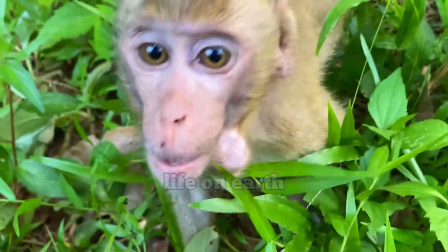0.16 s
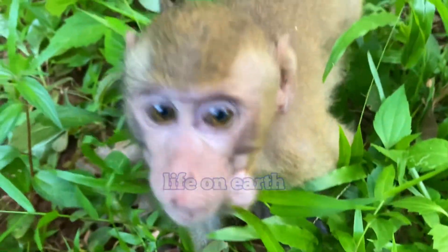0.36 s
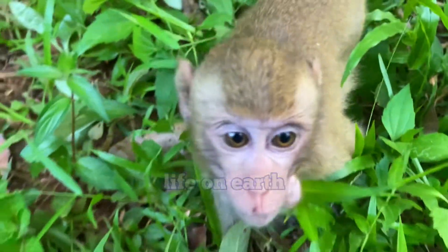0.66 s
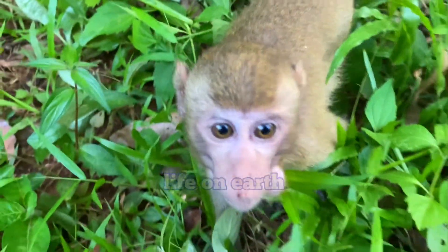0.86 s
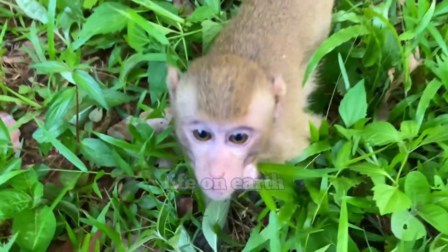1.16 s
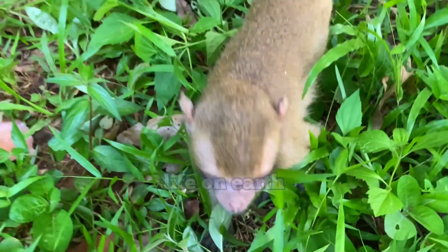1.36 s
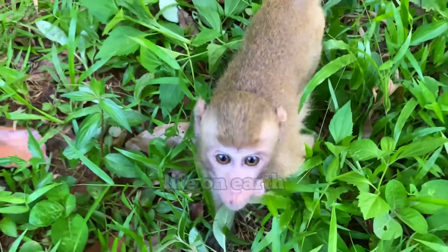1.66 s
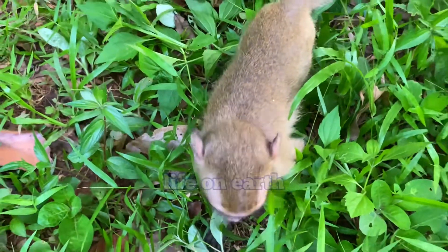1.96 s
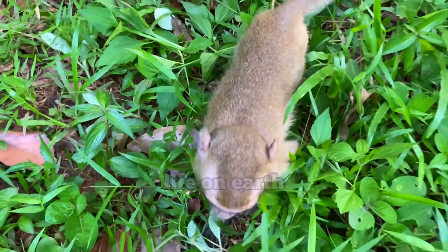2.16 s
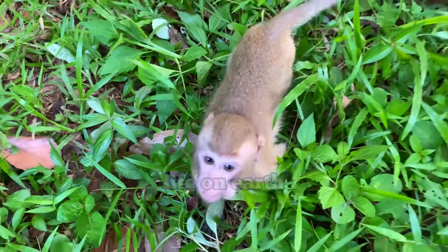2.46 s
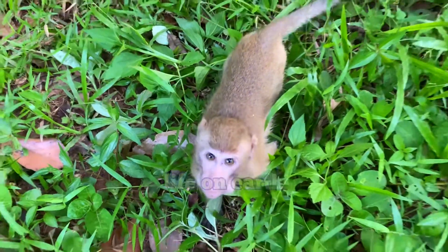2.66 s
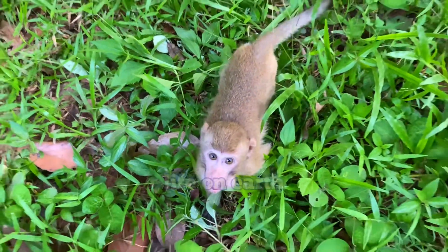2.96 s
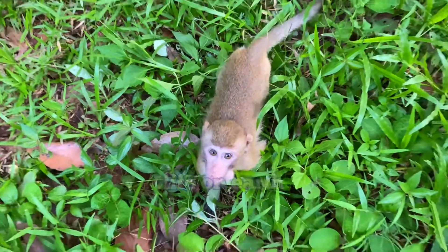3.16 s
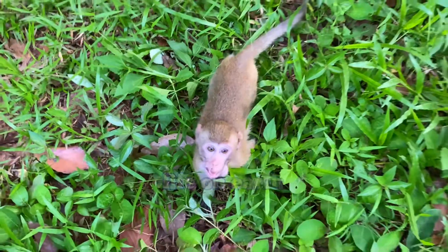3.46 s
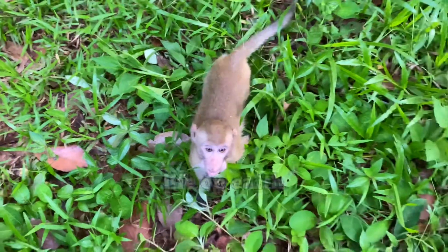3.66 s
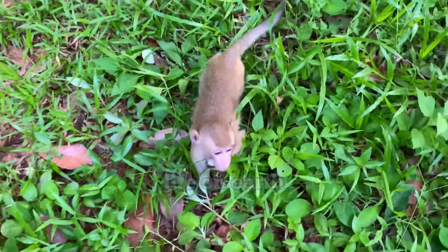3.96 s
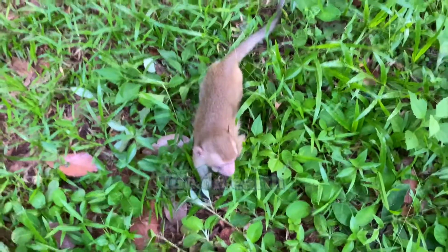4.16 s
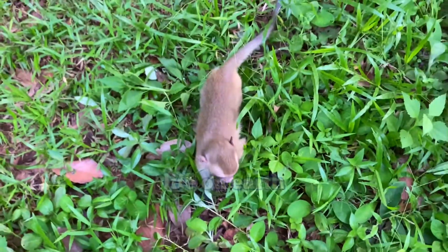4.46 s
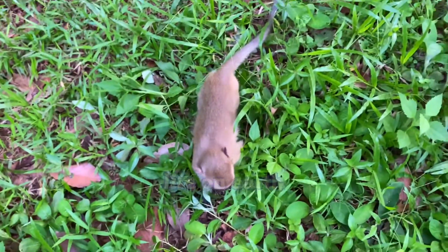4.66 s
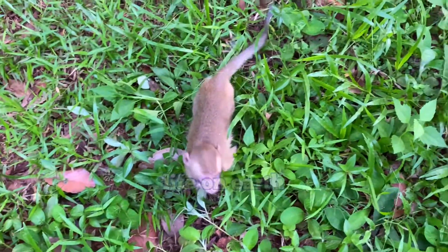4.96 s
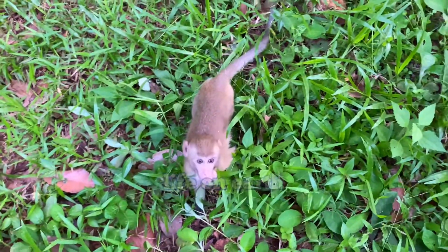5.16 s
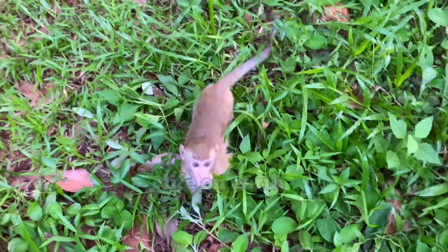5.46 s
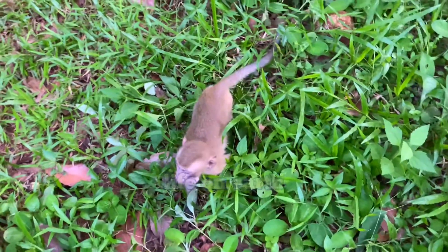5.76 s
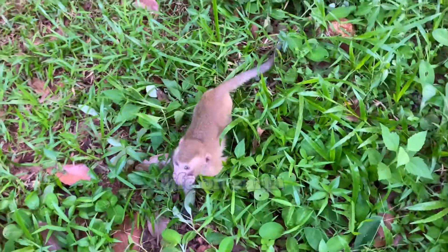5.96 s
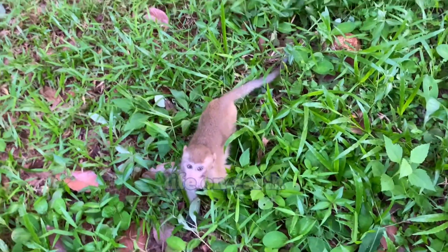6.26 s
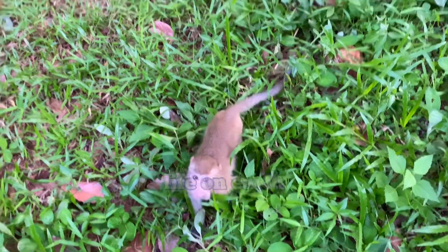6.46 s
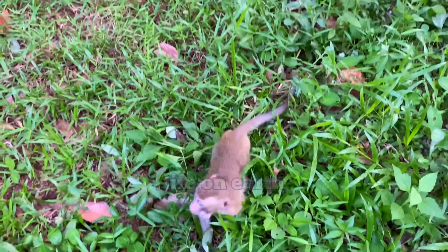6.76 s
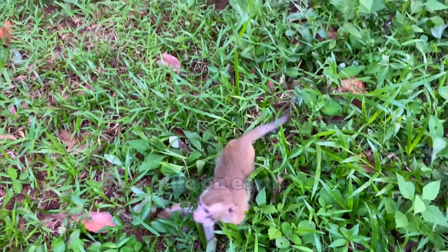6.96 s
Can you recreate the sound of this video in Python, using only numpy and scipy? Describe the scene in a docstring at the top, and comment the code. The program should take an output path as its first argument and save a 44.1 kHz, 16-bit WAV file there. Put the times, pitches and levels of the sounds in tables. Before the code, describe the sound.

Irregular crisp snaps and leafy rustles thicken into a busy crunching flurry outdoors, then a soft grass swish fades toward a few short bird whistles.

```python
"""Small monkey foraging in grass and dry leaves

Stems snap as noise slips ringing a thud, crack and tick; leaves rustle as dense tiny bursts mixed with noise.
Fur brushes stiff blades as resonant ticks; wind, far air, insects and a long grass swish are shaped noise.
A far cricket trills in tone pulses, a hand bumps the phone in low swings, a bird whistles falling tones at the end.
Two microphone ports hear all this partly alike, with phase and level offsets by band.
"""
import sys
import numpy as np
from scipy import signal
from scipy.fft import rfft, irfft, next_fast_len
from scipy.io import wavfile
from scipy.ndimage import uniform_filter1d

SR = 44100
rng = np.random.default_rng(int(sys.argv[2]) if len(sys.argv) > 2 else 0)


def master_out(mix):
    """Clip the mix to full scale and print it as 16-bit PCM to the path in sys.argv[1]."""
    frames = np.transpose(np.atleast_2d(mix))
    ceiling = np.clip(frames, -1, 1)
    pcm = np.round(ceiling * 32767).astype(np.int16)
    wavfile.write(sys.argv[1], SR, pcm)


N = 313551


def gain_of(db):
    """Amplitude factor of a level in dB."""
    return 10 ** (np.asarray(db) / 20)


def evened(x):
    """Scales to unit RMS."""
    return x / np.sqrt(np.mean(x ** 2) + 1e-20)


def peaked(x):
    """Scales each channel to unit peak."""
    return x / abs(x).max(axis=-1, keepdims=True)


def read(points, hz, column=1):
    """Interpolates a table column over log frequency."""
    points = np.asarray(points)
    return np.interp(np.log(hz + 1), np.log(points[:, 0] + 1), points[:, column])


def curve(points, column=1):
    """Interpolates a table column over every sample of the scene."""
    points = np.asarray(points)
    return np.interp(np.arange(N) / SR, points[:, 0], points[:, column])


def add(mix, start_s, sound):
    """Adds a sound in place, cut at the scene's end."""
    part = mix[..., round(start_s * SR):][..., :sound.shape[-1]]
    part += sound[..., :part.shape[-1]]


def stereo_noise():
    """Independent white noise in two channels."""
    return rng.standard_normal((2, N))


def coloured(x, spectrum):
    """Filters by a level-over-frequency table, then scales to unit RMS."""
    size = next_fast_len(N)
    gains = gain_of(read(spectrum, np.fft.rfftfreq(size, 1 / SR)))
    return evened(irfft(rfft(x, size) * gains, size)[..., :N])


def ring(x, hz, width_hz):
    """Damped resonance; two equal sections steepen its skirts."""
    r = np.exp(-np.pi * width_hz / SR)
    section = [1, 0, -1, 1, -2 * r * np.cos(2 * np.pi * hz / SR), r * r]
    return signal.sosfilt([section, section], x)


def flicker(seconds):
    """Random wavering of unit RMS: noise averaged twice over the span."""
    span = max(round(seconds * SR), 2)
    smooth = uniform_filter1d(rng.standard_normal(N), span)
    return evened(uniform_filter1d(smooth, span))


def crackle(per_s, spread_db, decay_ms):
    """Tiny decaying noise bursts of uneven size at random moments."""
    size_db = spread_db * np.minimum(rng.exponential(1, N), 4)
    hits = gain_of(size_db) * (rng.random(N) < per_s / SR)
    t = np.arange(600) / SR
    swell = signal.oaconvolve(hits, np.exp(-t / (decay_ms / 1000)))[:N]
    return evened(swell) * stereo_noise()


# Leaf rustle over time. Each row: time in seconds, body level in dB, hiss level in dB, both before wavering.
RUSTLE_LEVELS = [(0.0, -42.5, -43.5), (0.25, -50.5, -49), (0.52, -42, -45.5), (0.63, -44, -46),
                 (0.7, -42.5, -44), (0.79, -43.5, -42), (0.92, -40.5, -43), (1.0, -47, -49.5),
                 (1.6, -47, -52), (1.78, -50.5, -51), (1.9, -46, -53.5), (2.0, -50, -54),
                 (2.18, -46.5, -47.5), (2.55, -49, -52.5), (3.08, -40.5, -46.5), (3.25, -48, -54),
                 (3.5, -48.5, -54), (3.82, -44, -49), (4.05, -50.5, -54.5), (4.5, -47.5, -51.5),
                 (4.65, -43.5, -47), (4.9, -42.5, -42), (5.01, -47, -42.5), (5.09, -35.5, -42),
                 (5.125, -42.5, -44), (5.17, -35.5, -41.5), (5.26, -43, -43), (5.33, -39.5, -45.5),
                 (5.37, -45.5, -46.5), (5.46, -45.5, -50), (5.55, -44, -45.5), (5.63, -48.5, -53.5),
                 (5.75, -42, -44), (5.88, -38.5, -46.5), (6.06, -47, -46.5), (6.2, -40, -46),
                 (6.32, -45, -53), (6.42, -46.5, -51.5), (7.11, -50, -56.5)]
# Spectrum of the leaf body. Each row: frequency in Hz, relative level in dB.
LEAF_BODY_SPECTRUM = [(60, -55), (120, -6), (280, 3), (700, 0), (1400, -5.5), (2000, -14.5), (3000, -16),
                      (6000, -87)]
# Spectrum of the leaf hiss. Each row: frequency in Hz, relative level in dB.
LEAF_HISS_SPECTRUM = [(1500, -6), (2300, 7.5), (3200, -7), (4400, 4.5), (6500, -7), (8000, -8),
                      (12300, -6.5), (13200, -12), (14800, -46), (15800, -55)]
DRYNESS = .35  # 1 = crackling leaf only, 0 = smooth noise only


def rustle():
    """Many small leaf snaps blur into a body and a hiss; smooth noise fills in for soft grass."""
    shared = crackle(250, 0.8, 2.55)
    body_leaf = shared + 1.2 * crackle(250, 3.5, 1.4)
    hiss_leaf = shared + 2.0 * crackle(300, 5.2, 8.0)
    body = DRYNESS * body_leaf + 1.07 * (1 - DRYNESS) * stereo_noise()
    hiss = DRYNESS * hiss_leaf + 1.05 * (1 - DRYNESS) * stereo_noise()
    body_db = curve(RUSTLE_LEVELS) + 2.2 * flicker(.012)
    hiss_db = curve(RUSTLE_LEVELS, column=2) + 1.1 * flicker(.012)
    return (gain_of(body_db) * coloured(body, LEAF_BODY_SPECTRUM)
            + gain_of(hiss_db) * coloured(hiss, LEAF_HISS_SPECTRUM))


# Fur brushing blades over time. Each row: time in seconds, level in dB.
BRUSH_LEVELS = [(0, -60), (.15, -68), (.5, -49), (.64, -55), (.69, -44), (.79, -52), (.85, -41), (.96, -47),
                (1.0, -54), (1.3, -69.5), (1.58, -46), (1.7, -53), (2.0, -68), (2.2, -69), (2.5, -58),
                (2.8, -80)]
BRUSH_HZ, BRUSH_WIDTH_HZ = 4770, 1500


def brush():
    """Fur brushes stiff blades near the phone: dense ticks and soft hiss in one broad high resonance."""
    ticks = crackle(660, 5.7, 5.1) + 0.38 * stereo_noise()
    return gain_of(curve(BRUSH_LEVELS)) * evened(ring(ticks, BRUSH_HZ, BRUSH_WIDTH_HZ))


# Wind at the ports over time. Each row: time in seconds, level in dB before a 3 dB lift and wavering.
WIND_LEVELS = [(0.0, -40), (0.57, -43), (0.73, -46.5), (0.87, -42), (1.35, -49.5), (1.45, -42.5),
               (2.0, -49), (2.1, -45), (2.3, -43.5), (2.7, -46), (2.75, -29.5), (2.81, -47), (2.95, -43),
               (3.08, -43), (3.2, -41), (3.34, -49), (3.54, -40.5), (3.7, -43.5), (3.95, -42), (4.14, -44),
               (4.45, -43.5), (4.77, -44), (5.13, -44), (5.5, -44), (5.7, -44), (6.4, -44), (7.0, -46),
               (7.11, -40.5)]
# Spectrum of the wind. Each row: frequency in Hz, relative level in dB.
WIND_SPECTRUM = [(15, -41), (30, -13.5), (48, 0), (64, 3.5), (80, 2.5), (110, -5.5), (170, -9), (300, -27),
                 (700, -100)]


def wind():
    """Lumpy low rumble of air at the ports, with one short surge at the hand's bump."""
    waver_db = 0.5 * flicker(0.02) + 0.67 * flicker(0.062)
    level_db = curve(WIND_LEVELS) + 3.0 + waver_db
    return gain_of(level_db) * coloured(stereo_noise(), WIND_SPECTRUM)


# Spectrum of the far air. Each row: frequency in Hz, relative level in dB.
AIR_SPECTRUM = [(60, -34), (150, 16), (280, 11), (700, -1), (1400, -10), (2300, -4), (4400, -24),
                (6500, -48), (9000, -25), (12500, -42), (13200, -76)]
AIR_DB = -55


def air():
    """Steady far outdoor air: shaped noise, mostly low."""
    return gain_of(AIR_DB) * coloured(stereo_noise(), AIR_SPECTRUM)


# Spectrum of the insect chorus. Each row: frequency in Hz, relative level in dB.
INSECT_SPECTRUM = [(6000, -70), (7000, -36), (8000, -4), (9200, -5.5), (10300, 1.5), (11500, -1),
                   (12300, 0), (13100, -61)]
INSECTS_DB = -53.5  # before wavering


def insects():
    """A far insect chorus blurs into a steady high band of noise, wavering slightly."""
    return gain_of(INSECTS_DB + 0.47 * flicker(0.041)) * coloured(stereo_noise(), INSECT_SPECTRUM)


SMALL_SNAPS = 25
SMALL_THUD_OVER_BODY_DB, SMALL_CRACK_OVER_HISS_DB = 10, 12  # upper limits before the lifts in snaps()
SMALL_TICK_DB, SMALL_SPREAD_DB = -63, 5
SMALL_THUD_HZ, SMALL_CRACK_HZ, SMALL_MS = (402, 1720), (2340, 5750), (0.92, 1.3)  # ranges


def between(ends, share):
    """Geometric interpolation between two ends."""
    return ends[0] * (ends[1] / ends[0]) ** share


def small_snaps():
    """Rows for faint snaps at random moments, more often and louder where the rustle is strong."""
    when, thud, crack, length = rng.random((SMALL_SNAPS, 4)).T
    thud_drop_db, crack_drop_db = SMALL_SPREAD_DB * abs(rng.standard_normal((2, SMALL_SNAPS)))
    body_db, hiss_db = curve(RUSTLE_LEVELS), curve(RUSTLE_LEVELS, column=2)
    busy = np.cumsum(gain_of(body_db))
    at = np.searchsorted(busy, when * busy[-1])
    thud_db = body_db[at] + SMALL_THUD_OVER_BODY_DB - thud_drop_db
    crack_db = hiss_db[at] + SMALL_CRACK_OVER_HISS_DB - crack_drop_db
    tick_db = np.full(SMALL_SNAPS, SMALL_TICK_DB)
    return np.transpose([at / SR, between(SMALL_THUD_HZ, thud), thud_db,
                         between(SMALL_CRACK_HZ, crack), crack_db, tick_db, between(SMALL_MS, length)])


# Clear snaps of stems and leaves. Each row: time in seconds (the burst starts 0.9 ms earlier), thud pitch in Hz,
# thud level in dB before a 3 dB lift, crack pitch in Hz, crack level in dB before a 2 dB lift,
# tick level in dB before a 3 dB lift, decay time in ms.
CLEAR_SNAPS = [(0.0479, 686, -26, 3000, -27.5, -70, 2.9), (0.084, 1630, -25.5, 2700, -44, -66, 2),
               (0.2083, 377, -32, 2580, -27, -49, 0.79), (0.31, 1800, -27.5, 5160, -24.5, -35, 1.5),
               (0.3128, 1550, -29, 3530, -23, -55, 1.4), (0.409, 520, -34, 6700, -31, -26, 0.23),
               (0.4781, 1540, -16.5, 4600, -21, -27.5, 2.7), (0.529, 525, -23.5, 4660, -39, -58, 3.4),
               (0.673, 1400, -32, 4500, -25, -53, 0.86), (0.6874, 1160, -26, 4300, -30, -47, 2.6),
               (0.7151, 1290, -21, 4430, -24.5, -47, 0.25), (0.7642, 1240, -30.5, 4760, -33, -37, 2.9),
               (0.8163, 1230, -27, 4400, -28, -55, 6.4), (0.841, 1190, -24, 4840, -32, -61.5, 7.2),
               (0.868, 1300, -24.5, 2500, -30, -55, 0.76), (0.9202, 1260, -29, 4630, -29, -50.5, 4.6),
               (0.9552, 1630, -32, 4220, -29, -47, 1.3), (1.0062, 565, -27, 2500, -51, -56, 0.93),
               (1.2835, 460, -30, 4500, -26, -50, 2.6), (1.4826, 627, -25, 4020, -42, -60, 0.6),
               (1.545, 646, -52, 4400, -25, -58, 2.1), (1.5945, 567, -24, 4670, -20, -46, 2.4),
               (1.6378, 1860, -30, 4570, -25.5, -51, 0.93), (1.6832, 1160, -25.5, 3200, -33, -57, 2.2),
               (1.77, 2100, -25, 2360, -39, -54, 2), (1.8063, 1300, -33.5, 2530, -24, -48, 2.4),
               (2.013, 740, -24, 3570, -40, -63, 0.65), (2.1322, 1380, -32.5, 5160, -29, -54, 2.4),
               (2.195, 700, -30.5, 2580, -54.5, -53.5, 6.7), (2.333, 1320, -32.5, 3780, -37, -56, 3.7),
               (2.44, 1970, -29, 4550, -30.5, -40, 2.1), (2.4762, 504, -26, 4430, -40, -61, 1.3),
               (2.7748, 590, -26, 5000, -42, -55, 3.6), (2.8308, 1280, -37, 2400, -25.5, -45, 1.5),
               (2.9746, 1450, -34, 2920, -30, -47, 2.3), (3.0797, 860, -22, 2240, -20.5, -51.5, 0.33),
               (3.0936, 1320, -18, 4700, -25.5, -52, 2.7), (3.1366, 856, -20, 2840, -37, -59, 2.3),
               (3.1537, 920, -26, 4960, -29.5, -52.5, 4.7), (3.1669, 670, -26, 2340, -20, -38, 3.6),
               (3.1867, 800, -32, 2370, -28, -45, 2.2), (3.2039, 413, -26, 3250, -29, -45, 0.51),
               (3.362, 495, -23.5, 2430, -37, -47, 0.41), (3.4343, 860, -24, 3030, -30.5, -45, 0.38),
               (3.5207, 540, -26, 2420, -47, -52, 3.3), (3.557, 1140, -19.5, 2390, -36, -51, 0.9),
               (3.6016, 854, -28, 4250, -35.5, -38, 2.9), (3.6399, 460, -20.5, 2515, -56, -58, 1.9),
               (3.693, 2030, -29, 2430, -18.5, -65, 1.1), (3.7234, 640, -24.5, 2540, -31, -57, 1.5),
               (3.7887, 1460, -27, 2560, -27.5, -59, 4), (3.8325, 1390, -28, 2330, -49, -55, 4),
               (3.862, 630, -22.5, 2400, -26, -57, 2), (3.9049, 1410, -41, 2940, -19.5, -73, 0.77),
               (3.9675, 1150, -24.5, 4540, -22.5, -37, 1.5), (4.0598, 640, -27.5, 3190, -59, -57, 2.1),
               (4.1288, 614, -29, 4630, -57, -62, 1.5), (4.197, 1650, -35, 4200, -26.5, -57, 0.43),
               (4.2024, 1370, -25.5, 6040, -32, -27, 0.68), (4.2544, 514, -25.5, 3010, -39, -56, 3.9),
               (4.3009, 1150, -33, 5500, -39, -29, 1.4), (4.344, 734, -32, 2230, -25, -47, 1.7),
               (4.3518, 368, -26, 4930, -25.5, -35, 1.2), (4.4261, 666, -25.5, 4540, -53, -58, 1.3),
               (4.5022, 534, -25, 4160, -57, -56, 0.96), (4.593, 596, -22.5, 5600, -34.5, -53, 1.5),
               (4.65, 1210, -28, 3510, -36, -24, 0.62), (4.7353, 1020, -21.5, 5850, -27, -50, 0.3),
               (4.8254, 670, -24, 2860, -35, -54, 1.6), (4.8591, 760, -17.5, 5460, -25.5, -35, 1.24),
               (4.874, 362, -21.5, 4450, -31, -27, 0.97), (4.892, 745, -18, 5500, -26, -13.5, 0.58),
               (4.9156, 980, -26, 3040, -19.5, -42, 3.4), (4.9374, 1210, -21, 4840, -13.5, -15.5, 0.4),
               (4.9775, 1140, -21, 6700, -22, -19, 0.99), (4.9857, 1260, -23, 4040, -21, -48.5, 1.4),
               (5.0348, 1450, -18.5, 4370, -22, -31, 1.3), (5.0429, 845, -13, 5560, -20, -50.5, 0.98),
               (5.0586, 1200, -27, 3420, -25, -41.5, 0.62), (5.0893, 1630, -24, 4950, -26, -37, 2.5),
               (5.0984, 960, -22, 3480, -27, -47.5, 0.84), (5.139, 1280, -21, 3200, -32, -27, 1.1),
               (5.1495, 720, -12, 2450, -16.5, -16.5, 0.5), (5.1552, 655, -13.5, 4720, -13, -22, 1.7),
               (5.1724, 1360, -21.5, 4720, -47, -55, 2.3), (5.1877, 1200, -30, 4200, -31, -50, 1),
               (5.208, 1350, -24, 3470, -38, -49, 2.1), (5.22, 835, -19, 5900, -35, -25, 0.31),
               (5.2331, 670, -12.5, 3330, -29, -38, 1.4), (5.27, 410, -40, 4750, -24, -51.5, 0.76),
               (5.2996, 840, -35, 2280, -25.5, -52, 1.7), (5.3157, 1410, -23.5, 3640, -36, -31, 0.76),
               (5.32, 870, -22, 2450, -42.5, -58, 1.3), (5.349, 910, -23.5, 5280, -44, -56, 0.91),
               (5.385, 1500, -26, 4900, -20, -35, 1.6), (5.4106, 1090, -18, 2540, -24, -34, 1.9),
               (5.4221, 1820, -18, 5160, -34, -27.5, 1.1), (5.4877, 1430, -10.5, 3900, -27, -50, 1.9),
               (5.5066, 710, -17.5, 3000, -23.5, -50, 1.7), (5.5456, 1080, -22, 5660, -30, -41, 0.62),
               (5.5833, 1170, -28.5, 3800, -31, -29.5, 0.84), (5.68, 1980, -18, 3100, -28, -35, 1.1),
               (5.7395, 1300, -24.5, 4700, -30, -36, 1.2), (5.7476, 1530, -28, 3800, -35, -29, 0.68),
               (5.765, 1150, -29, 5900, -30, -39, 0.81), (5.791, 750, -14, 4300, -26, -37, 0.39),
               (5.8089, 1260, -16.5, 4180, -38, -57, 2), (5.8139, 1390, -15.5, 4200, -18, -30, 2.5),
               (5.8317, 1410, -28, 3440, -23, -24, 0.65), (5.86, 870, -15, 2500, -30, -51, 1),
               (5.8672, 1510, -37, 4450, -20, -27, 0.66), (5.8799, 1400, -31, 6760, -25, -26, 0.73),
               (5.9315, 1390, -23, 4230, -29, -28, 0.76), (5.8946, 1200, -22, 4300, -33, -45, 0.98),
               (5.9783, 1460, -28, 3350, -40, -48, 2.8), (5.94, 1180, -16, 4600, -28, -54, 0.48),
               (6.0064, 720, -23.5, 4690, -34, -51.5, 2), (6.078, 487, -23, 2820, -50, -55, 2.4),
               (6.1969, 1330, -34, 2740, -23.5, -23, 0.59), (6.2052, 510, -21.5, 4460, -31, -52, 4.2),
               (6.2235, 400, -20.5, 3270, -34, -47, 2.6), (6.5455, 1050, -26, 2350, -47, -43, 0.67),
               (6.8004, 1080, -30, 4450, -44, -49, 5.5), (6.8355, 2100, -29, 4060, -34.5, -32, .9),
               (6.9628, 763, -27, 3570, -35.5, -53.5, 5.2), (6.9829, 1810, -24.5, 2370, -40.5, -58, 0.27),
               (.158, 1200, -36, 2270, -34, -56, 1.9), (.192, 1930, -43, 4070, -41, -55, 1.5),
               (.349, 1700, -37, 4000, -35.5, -52, 2.3), (.437, 1700, -46, 3470, -36, -42, 1.8),
               (.49, 1120, -28, 5060, -27, -55, 1.7), (.54, 500, -31, 4300, -33, -52, 1.4),
               (.583, 500, -43, 3600, -37, -36, 1.2), (.604, 500, -30, 4500, -28, -55, 1.5),
               (.722, 595, -22, 4900, -43, -55, 1.4), (.778, 900, -36, 5170, -38, -55, 1.5),
               (.832, 1100, -35, 4500, -37, -55, 1.5), (.856, 804, -26, 4500, -31, -50, 1.6),
               (.881, 900, -38, 4830, -28, -53, 2.1), (.905, 500, -33, 4250, -32, -51, 1.5),
               (.944, 900, -32, 5000, -36, -47, 2.3), (1.042, 796, -25.5, 3500, -57, -55, 2),
               (1.082, 806, -32, 5800, -39, -55, 1.9), (1.094, 890, -36, 4600, -33, -41, 2.4),
               (1.187, 900, -38, 5700, -37, -55, 1.2), (1.199, 490, -25.5, 2600, -35, -55, 1.7),
               (1.231, 600, -42, 4700, -32.5, -55, 1.3), (1.347, 1390, -36, 4970, -35, -59, 1.5),
               (1.354, 500, -52, 5030, -36.5, -60, 1.5), (1.505, 705, -32, 5630, -39, -55, 1.2),
               (1.668, 447, -32, 3900, -43, -58, 2.5), (1.753, 500, -54, 4300, -31.5, -58, 1.5),
               (1.842, 600, -31, 4400, -46, -58, 3.5), (1.877, 990, -28, 5200, -42, -58, 1.9),
               (1.894, 1210, -36, 4400, -54, -58, 1.5), (1.933, 1310, -40, 2300, -34.5, -55, 1.4),
               (2.074, 800, -39, 3620, -38, -55, 2.9), (2.098, 1820, -32.5, 4800, -40, -57, 1.3),
               (2.156, 600, -26, 2500, -43, -55, 1.4), (2.169, 500, -45, 5160, -32, -55, 1),
               (2.181, 1310, -30.5, 3530, -40, -43, 1.3), (2.192, 675, -28, 5340, -40, -50, 3.8),
               (2.22, 1400, -46, 4800, -32, -50, 1.7), (2.247, 600, -39, 2300, -47, -55, 1.5),
               (2.261, 2120, -39, 2300, -31, -55, 0.96), (2.559, 700, -46, 4050, -44, -55, 1.5),
               (2.691, 526, -25.5, 2500, -42, -57, 2.8), (2.755, 700, -45, 4700, -31, -55, 1.5),
               (2.92, 1200, -40, 5630, -39, -55, 1), (2.961, 690, -28, 4800, -54, -57, 1.7),
               (3.041, 600, -28, 2300, -29, -52, 1.6), (3.182, 700, -24, 2700, -28, -48, 1),
               (3.254, 475, -26, 2700, -51, -58, 2.6), (3.625, 900, -45, 2300, -31, -58, 1.5),
               (3.671, 900, -34, 2300, -50, -58, 1.7), (3.754, 1200, -34, 2300, -29, -55, 1.5),
               (3.81, 1200, -51, 3860, -35, -50, 1.1), (3.853, 1290, -27, 4060, -33, -55, 1.2),
               (3.938, 497, -33, 3600, -32, -55, 1.5), (4.004, 1000, -32, 3300, -39, -58, 1.2),
               (4.019, 900, -41, 3700, -34.5, -62, 2.5), (4.32, 700, -31, 2500, -31, -55, 1.7),
               (4.414, 1400, -35, 3740, -36.5, -58, 1), (4.42, 1400, -39, 2300, -29, -51, 0.92),
               (4.532, 1380, -33, 4000, -39.5, -55, 1.5), (4.572, 950, -28, 5700, -40, -55, 3.1),
               (4.659, 500, -45, 3950, -30, -55, 1.3), (4.691, 1590, -32, 4600, -44, -50, 1.2),
               (4.72, 700, -47, 4900, -32, -53, 1.6), (4.752, 447, -25.5, 5100, -33, -33, 1.8),
               (4.817, 1100, -36, 6000, -29, -50, 1.3), (4.878, 900, -31, 3900, -36, -46, 1.2),
               (4.944, 800, -23, 5600, -30, -41, 1.1), (5.109, 500, -25, 3700, -25, -48, 1.3),
               (5.254, 1300, -28, 3400, -32, -57, 0.91), (5.276, 786, -28.5, 4800, -43, -52, 1.3),
               (5.33, 700, -26, 3000, -40, -52, 1.6), (5.34, 1200, -26, 3230, -25, -52, 0.81),
               (5.512, 1200, -31, 4000, -29, -40, 0.84), (5.569, 596, -30, 2400, -44, -55, 2.2),
               (5.574, 1200, -35, 4900, -30.5, -48, 0.89), (5.594, 1310, -35, 5170, -31, -46, 1.1),
               (5.658, 600, -27, 3100, -47, -58, 1.1), (5.714, 800, -27, 2300, -38, -55, 1.7),
               (5.947, 1210, -27, 2560, -29, -45, 1), (5.962, 1400, -24, 3240, -34, -44, 1),
               (6.189, 1320, -25, 3000, -35, -50, 2.3), (6.219, 685, -20.5, 3100, -33, -52, 2.7),
               (6.233, 700, -22, 3200, -33, -48, 0.85), (6.394, 500, -46, 6100, -38, -52, 1.5),
               (6.408, 700, -33, 3000, -43, -55, 1.7), (6.481, 700, -39, 3600, -47.5, -54.5, 1.5),
               (6.52, 600, -34, 3680, -40.5, -55, 1.1), (6.869, 1040, -30.5, 4360, -45, -55, 1.8),
               (.6575, 800, -29, 4500, -40, -55, 1.7), (.7022, 890, -24.5, 5140, -37, -50, 1.8),
               (.7323, 1080, -33, 4300, -42, -55, 1.2), (.7423, 494, -27, 6000, -45, -50, 0.92),
               (.7867, 533, -27, 4800, -42, -55, 2.1), (1.5904, 600, -48, 5100, -34, -50, 1.3),
               (2.4729, 700, -32, 4800, -30, -57, 1), (2.9004, 900, -30, 2500, -40, -55, 2.2),
               (3.0566, 1040, -31, 3520, -39, -55, 1.2), (3.7969, 1100, -32, 5200, -36, -55, 1.4),
               (3.8453, 1310, -36, 3000, -37, -55, 0.91), (4.1395, 600, -35, 2300, -50, -58, 2.8),
               (4.8415, 685, -30, 3600, -42, -55, 3), (4.8979, 970, -24, 5800, -39, -48, 1.2),
               (4.91, 1420, -35, 3400, -44, -48, .8), (4.9255, 1200, -43, 4400, -37, -52, 1.3),
               (5.0016, 1300, -40, 3060, -33, -50, 1), (5.032, 1400, -31, 4200, -35, -50, 0.86),
               (5.0362, 490, -13, 3500, -47, -55, 2.3), (5.0665, 794, -26, 3200, -36, -52, 2.2),
               (5.083, 1000, -29, 3360, -36, -48, 1.3), (5.1348, 704, -22, 4500, -38, -52, 2),
               (5.1675, 600, -21, 4500, -35, -50, 2), (5.2032, 1400, -34, 4180, -33, -52, 1),
               (5.2137, 1400, -30, 3000, -40, -55, 1.2), (5.2236, 1100, -23, 3340, -30, -45, 1.1),
               (5.3693, 700, -34, 2800, -38, -55, 1.5), (5.3885, 795, -17, 3000, -40, -55, 1),
               (5.4182, 1430, -35, 4000, -42, -55, 1), (5.425, 585, -18.5, 2500, -40, -55, 1.2),
               (5.5534, 710, -28, 2500, -42, -55, 1.8), (5.732, 1720, -31, 3000, -33, -55, 1),
               (5.8835, 1420, -30, 3500, -42, -55, 2.9), (5.9255, 1200, -36, 4400, -33, -52, 0.85),
               (6.1934, 990, -24, 4000, -28.5, -48, 1), (6.2285, 1100, -29, 2300, -29, -52, 1),
               (6.2408, 930, -25, 3200, -39, -55, 1.3)]
SCRAPE_SHARE, SCRAPE_S = .028, .012
SAG_HZ, SAG_SHARE_BELOW, SAG_S = 520, .25, .0013
THUD_LAG_S = 0.000396


def snaps():
    """A stem breaks in a brief burst of slips that rings a low thud, a mid crack and a thin tick."""
    out, t = np.zeros((2, N)), np.arange(900) / SR
    for s, thud_hz, thud_db, crack_hz, crack_db, tick_db, decay_ms in [*CLEAR_SNAPS, *small_snaps()]:
        decay_s = max(decay_ms, .2) / 1000
        slips = rng.standard_normal((2, 900))
        snap_shape = (1 - np.exp(-t / (0.00035 + 0.18 * decay_s))) * np.exp(-t / decay_s)
        # a short scrape trails the break
        burst = slips * (snap_shape + SCRAPE_SHARE * np.exp(-t / SCRAPE_S))

        # the stem slackens, so its pop falls in pitch
        pop_hz = thud_hz - SAG_HZ * (SAG_SHARE_BELOW - np.exp(-t / SAG_S))
        cycles = np.cumsum(pop_hz) / SR + rng.random((2, 1))
        pop_shape = (1 - np.exp(-t / 0.000043)) * np.exp(-t / (1.04 * decay_s))
        pop = peaked(np.sin(2 * np.pi * cycles) * pop_shape)

        thud = .52 * pop + .33 * peaked(ring(burst, thud_hz, .65 * thud_hz))
        thud += .24 * peaked(ring(burst, 1150, 1300))
        # the thud blooms after the crack
        thud = np.array([np.interp(t - THUD_LAG_S, t, side, left=0) for side in thud])
        crack = 0.56 * peaked(ring(burst, crack_hz, 900))
        crack += .5 * peaked(ring(burst, np.sqrt(crack_hz * 3700), 3720))
        tick = peaked(ring(burst, 5160, 12800))
        sound = gain_of(thud_db + 3.0) * thud + gain_of(crack_db + 2.0) * crack + gain_of(tick_db + 3.0) * tick
        add(out, s - .0009, sound)
    return out


# Trills of a far cricket. Each row: start in seconds, length in seconds, level in dB before wavering.
CRICKET_TRILLS = [(1.63, .29, -52), (2.415, .3, -53), (3.253, .3, -55), (3.975, .27, -52), (4.78, .27, -55),
                  (6.61, .35, -53)]
TRILL_HZ, TRILL_PULSES_PER_S = 4480, 45


def cricket():
    """Trains of short pulses on one wing tone, settling from slightly sharp, uneven from the distance."""
    out = np.zeros(N)
    for s, length_s, db in CRICKET_TRILLS:
        t = np.arange(0, length_s, 1 / SR)
        pulses = np.sin(np.pi * TRILL_PULSES_PER_S * t) ** 4 * signal.windows.tukey(len(t), .4)
        tone = np.sin(2 * np.pi * TRILL_HZ * (t - 0.0021 * np.exp(-t / 0.07)))
        add(out, s, gain_of(db) * pulses * tone)
    sides = np.array([[1], [-.4]])  # leans left
    return out * gain_of(2.2 * flicker(0.011)) * sides


# Bumps on the phone body. Each row: start in seconds, level in dB, pitch in Hz, length in seconds.
PHONE_BUMPS = [(2.7175, -27, 40, .0125), (2.7265, -19, 125, .018), (2.73, -20.5, 65, .036),
               (2.822, -32, 60, .04), (3.065, -35, 55, .04), (3.135, -33, 45, .04)]


def bumps():
    """A knock swings the phone body at a low pitch for a few cycles at most."""
    out = np.zeros(N)
    for s, db, hz, length_s in PHONE_BUMPS:
        t = np.arange(0, length_s, 1 / SR)
        swing = np.sin(2 * np.pi * hz * t) * signal.windows.tukey(len(t), .9)
        add(out, s, gain_of(db) * swing)
    return out


# One long sweep through soft grass. Each row: time in seconds, level in dB before wavering.
SWISH_LEVELS = [(5.7, -75), (5.85, -52), (5.97, -48), (6.11, -45), (6.22, -43), (6.37, -48.5), (6.51, -54),
                (6.65, -58), (6.9, -55)]
# Spectrum of the sweep. Each row: frequency in Hz, relative level in dB.
SWISH_SPECTRUM = [(1500, -30), (2300, -2), (3100, 0.5), (4000, -2), (4800, -2), (6300, -3), (8000, -6.5),
                  (10500, -5), (13000, -6), (14800, -10), (16000, -25)]
SWISH_FOCUS = 0.18  # 1 = from one spot, 0 = spread wide


def swish():
    """Blades of grass slide past together: a smooth, bright, finely grained hiss."""
    near, wide = stereo_noise()
    other_side = SWISH_FOCUS * near + np.sqrt(1 - SWISH_FOCUS ** 2) * wide
    blades = coloured(np.array([near, other_side]), SWISH_SPECTRUM)
    waver_db = 0.77 * flicker(0.0091) + 1.9 * flicker(0.028)
    return gain_of(curve(SWISH_LEVELS) + waver_db) * blades


# Bird whistles. Each row: start in seconds, level in dB before shaping and flutter,
# start pitch in Hz and end pitch in Hz below the hook, length in seconds.
BIRD_CHIRPS = [(6.963, -41, 4800, 4200, .022), (6.999, -35.5, 4950, 4100, .026),
               (7.037, -32, 4950, 4150, .026), (7.077, -32.5, 4950, 4100, .026)]


def bird():
    """Short falling whistles that start with a faint hook from above and flutter in level."""
    out = np.zeros(N)
    for s, db, start_hz, end_hz, length_s in BIRD_CHIRPS:
        t = np.arange(0, length_s, 1 / SR)
        hook_hz = 1100 * np.exp(-t / .002)
        hz = np.linspace(start_hz, end_hz, len(t)) + hook_hz
        rise = .2 + .8 * np.clip(t / .008, 0, 1) ** 3
        fall = np.clip((length_s - t) / .016, 0, 1)
        shape = rise * signal.windows.tukey(len(t), .3) * fall
        add(out, s, gain_of(db) * np.sin(2 * np.pi * np.cumsum(hz) / SR) * shape)
    return out * gain_of(1.8 * flicker(.0015))


def scene():
    """Sums all sources into two sound fields, which the ports then blend."""
    ground = rustle() + brush() + snaps() + swish()
    surroundings = wind() + air() + insects()
    return ground + surroundings + cricket() + bumps() + bird()


# The two microphone ports. Each row: frequency in Hz, left lead in radians before the tilt,
# likeness from 0 to 1, left-right level difference in dB.
PORT_BANDS = [(30, 0, .68, 0), (200, 0, .62, 0), (500, .3, .82, 1), (1500, .4, .8, -4), (2500, 2.9, .65, 1),
              (3500, 6.6, .5, 0), (4700, 9.2, .6, -3), (6300, 13, .6, -4), (7300, 11, .85, 0),
              (7800, 9.42, 1, 0), (8300, 9.42, 1, 0), (9000, 7.9, .8, 0), (10100, 6.28, 1, 0),
              (11000, 4.7, .8, 0), (11800, 3.14, 1, 0), (12500, 3.14, 1, 0), (13200, 0, .85, 0),
              (14500, 0, .85, 0), (15300, -3.14, 1, 0)]
# The phone is tipped. Each row: time in seconds, extra left lead in radians at its peak near 800 Hz.
TILT_LEAD = [(0, 1), (2.4, 1), (3, 0.58), (7.11, 0.099)]
# Treble response of the microphone. Each row: frequency in Hz, gain in dB.
MIC_RESPONSE = [(11000, -1), (13000, -7), (14500, -11), (16000, -10)]
EDGE_HZ = 16300


def record(dry):
    """The ports hear partly the same sound, shifted in phase and level by band; then the band limit."""
    hz, t, (a, b) = signal.stft(dry, SR, nperseg=512)
    likeness = np.clip(read(PORT_BANDS, hz, column=2), 0, 1)[:, None]
    tilt_band = np.exp(-np.log((hz[:, None] + 1) / 800) ** 2 / 0.88)
    lead = read(PORT_BANDS, hz)[:, None] + np.interp(t, *np.transpose(TILT_LEAD)) * tilt_band
    # each port takes half of the phase and level difference
    half = np.exp(.5j * lead) * gain_of(read(PORT_BANDS, hz, column=3) / 2)[:, None]
    left = a * half
    right = (likeness * a + np.sqrt(1 - likeness ** 2) * b) / half
    pair = np.array([left, right]) * gain_of(read(MIC_RESPONSE, hz))[:, None]
    out = signal.istft(pair, SR, nperseg=512)[1][:, :N]
    lowpass = signal.firwin(511, EDGE_HZ, window=("kaiser", 9), fs=SR)
    return signal.oaconvolve(out, lowpass[None], "same")


dry = scene()
out = record(dry)
master_out(out)
```